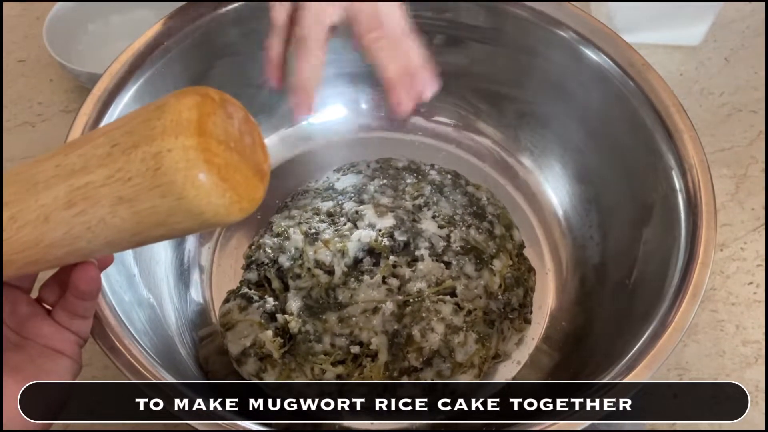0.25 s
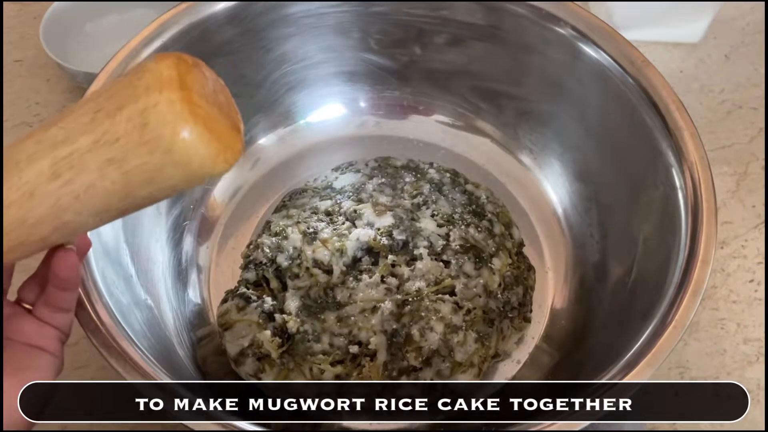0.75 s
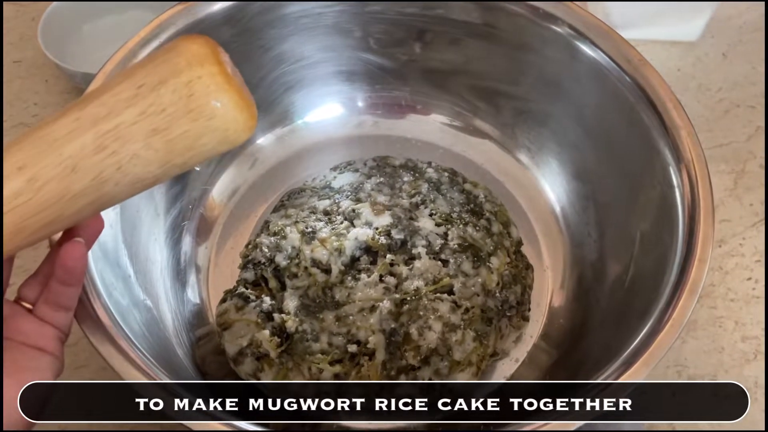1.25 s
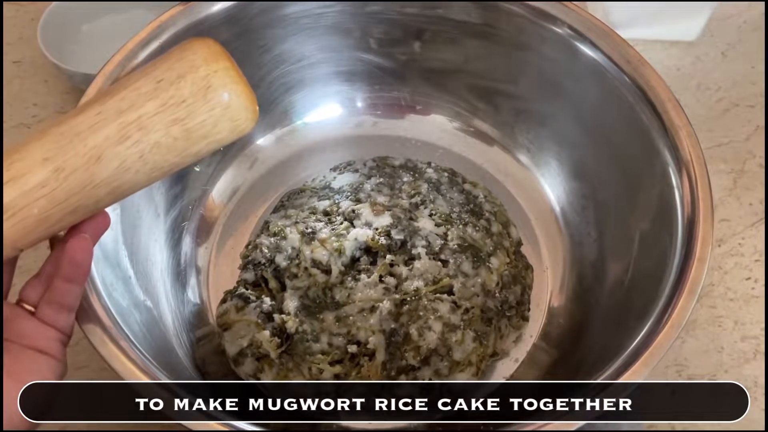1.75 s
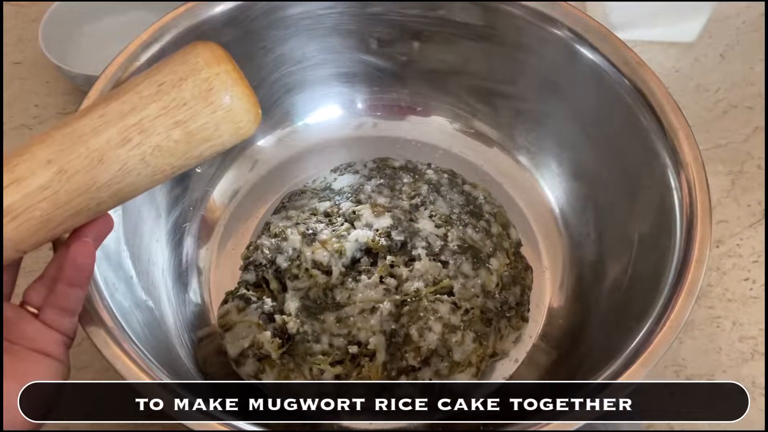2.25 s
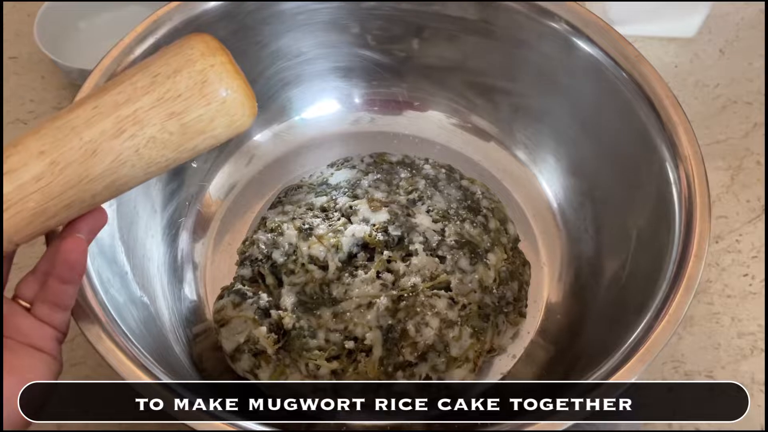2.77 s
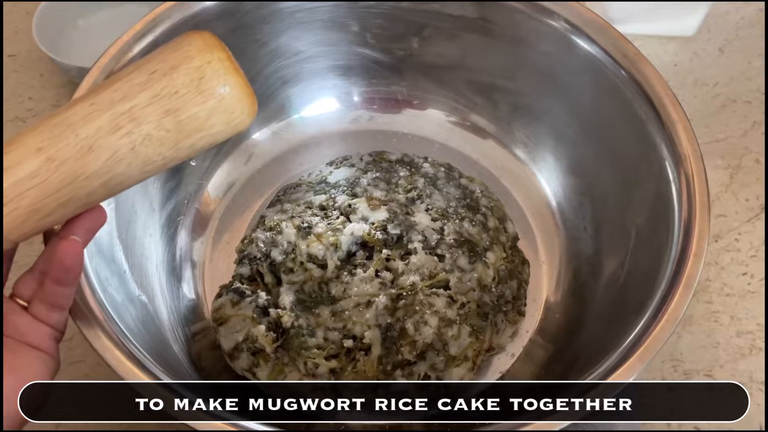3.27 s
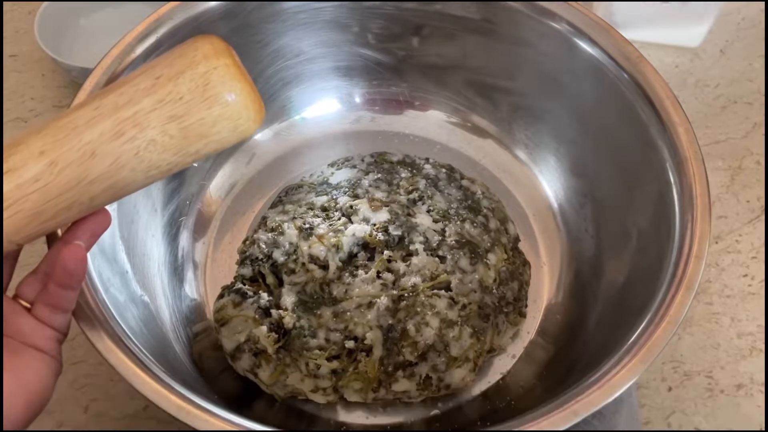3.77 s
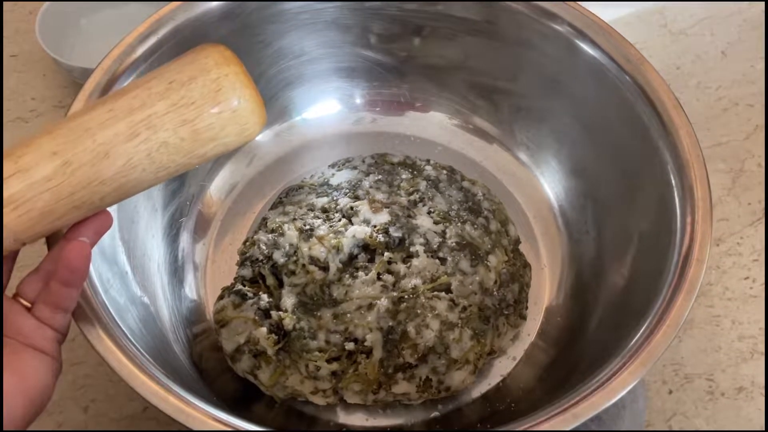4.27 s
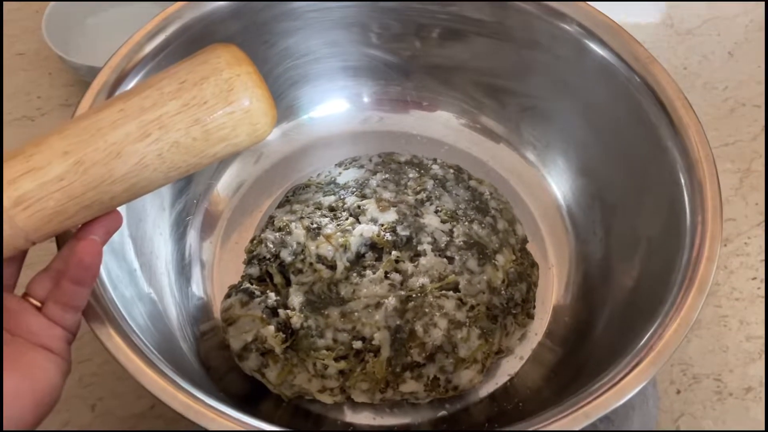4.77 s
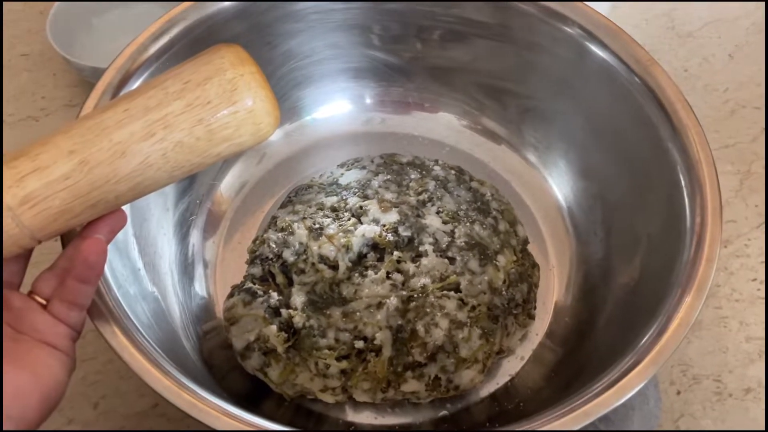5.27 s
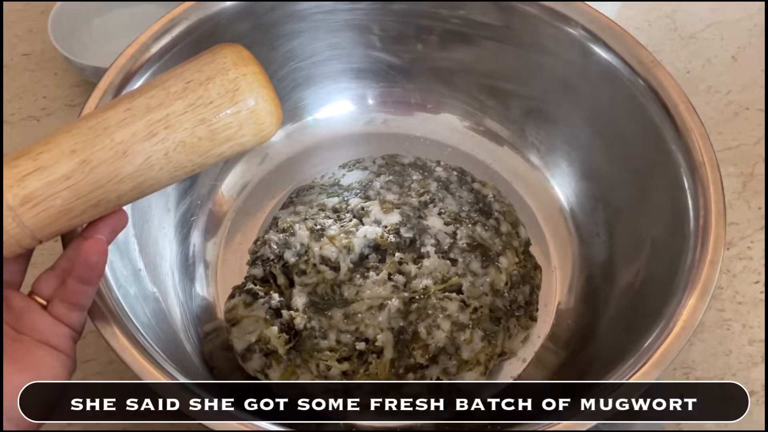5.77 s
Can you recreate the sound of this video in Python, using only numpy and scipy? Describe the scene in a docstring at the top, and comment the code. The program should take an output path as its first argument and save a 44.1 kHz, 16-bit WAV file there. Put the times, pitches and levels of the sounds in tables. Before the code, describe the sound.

Close up in a small, lightly echoing kitchen, a wooden pestle and dough-filled steel bowl are handled on a counter. Small clattering knocks come first, then a heavy double thud, a near-quiet pause with a faint squeak, a sharp metallic clank, and irregular clusters of dull thuds and short scrapes until the end. Low bumps and soft room hum lie beneath.

```python
"""Knocks: a wooden pestle and a steel bowl of sticky dough are knocked about on a kitchen counter.
Each knock adds a crack of smeared clicks, a damped thud, a counter boom and a little ring of the bowl.
Clinks of bare steel and a singing rim are fading tones. Drags, squeaks and ticks are shaped noise.
The kitchen echoes with fading noise, a wavering 50 Hz hum thumps and swells, and the room hums behind."""
import sys
import numpy as np
from scipy import signal
from scipy.fft import rfft, irfft, next_fast_len
from scipy.io import wavfile
from scipy.ndimage import uniform_filter1d

SR = 44100
rng = np.random.default_rng(int(sys.argv[2]) if len(sys.argv) > 2 else 0)


def to_wav(s):
    """Save 16-bit WAV."""
    ch = np.atleast_2d(s).T  # columns
    pcm = np.round(np.clip(ch, -1, 1) * 32767)  # PCM
    wavfile.write(sys.argv[1], SR, pcm.astype(np.int16))


N = 265482   # length of the scene in samples

# Knocks: start_s, crack_db, crack_tilt_db_per_octave, top_treble_db, crack_smear_s, thud_db, thud_hz,
#         thud_delay_s, thud_swell_s, counter_boom_db, ring_db (relative to the crack)
KNOCK_EVENTS = [(0.9, -31.5, -6, -70.5, .002, -63, 483, .001, 0.0043, -55, -25),
                (0.908, -17, -5.5, -42, 0.0013, -32.5, 555, 0.00287, 0.007, -58.5, -47),
                (0.917, -22, -4.5, -44, 0.00081, -16.5, 537, 0.00096, 0.002, -33.5, -5.5),
                (1.002, -24.5, -13.5, -52.5, .001, -23, 488, 0.00093, 0.0036, -32.5, 0.5),
                (1.014, -19, -10, -59, 0.00085, -24, 439, 0.0008, 0.0035, -31, -8),
                (1.02, -31, -4, -59, .0012, -25, 418, 0.0022, 0.0065, -44, -14),
                (1.147, -27, -8.5, -79, 0.0026, -27, 444, 0.0017, 0.0045, -44, -25),
                (1.158, -27, -9, -77, 0.0032, -28, 388, 0.002, 0.0032, -39.5, -28),
                (1.172, -29.5, -7.5, -75, 0.0013, -24.5, 417, 0.0013, 0.0042, -33.5, -16),
                (1.200, -26, -9, -73, 0.0015, -29, 430, 0.0023, 0.0072, -46, -13),
                (1.212, -31, -5, -68, 0.00073, -21.5, 267, 0.0011, 0.002, -27, -10),
                (1.353, -25.5, -12.5, -63, 0.00074, -23, 268, 0.002, 0.006, -26.5, -15.5),
                (1.603, -15.5, -6.5, -35, .0012, -5, 194.3, 0.0028, 0.0071, -36.5, -9.5),
                (1.637, -18, -10.5, -48, .001, -12, 381, 0.00094, 0.0019, -18.5, -33),
                (2.817, -38.5, -3.5, -73, 0.00074, -40, 310, 0.0041, 0.0033, -65, -7),
                (2.859, -34, 0, -66, 0.00092, -26.5, 221, .005, 0.006, -34.5, -11),
                (3.025, -9, -3.5, -21, 0.00071, -14.5, 236.5, 0.0041, 0.0067, -42.5, -9.5),
                (3.37, -19.5, -8, -59, 0.0013, -17, 220, .006, 0.0053, -54, -9.5),
                (3.4157, -23, -6.5, -42, 0.00097, -14.5, 207, .007, 0.0056, -35.5, -23),
                (3.433, -28, -4, -40, 0.0015, -18, 225, 0.0042, 0.005, -27.5, -6.5),
                (3.45, -26.5, -2.5, -20.5, 0.00022, -8.5, 204.6, 0.0055, 0.007, -13.5, -18),
                (3.484, -33, -9.5, -55, 0.001, -18.5, 198, 0.0017, 0.0039, -33.5, -6),
                (3.754, -49, -2, -59, 0.0012, -31.5, 258, 0.0012, 0.0032, -43, -20),
                (3.767, -43.5, -3, -53, .001, -25.5, 285, 0.00753, 0.0024, -28, -17),
                (3.976, -50, -1.5, -77, 0.00094, -25, 277, 0.0022, 0.007, -48, -5),
                (3.997, -51, -3, -55, .0012, -27, 270, 0.0022, 0.006, -42, -12),
                (4.045, -50, -9, -65, 0.0017, -28, 281, 0.0022, 0.0033, -37, -13),
                (4.179, -16.5, -10.5, -40, .0008, -11, 322, 0.0024, 0.0043, -27, -15.5),
                (4.190, -37, -3, -50, 0.00087, -17, 281, 0.0031, 0.0082, -35.5, -5),
                (4.233, -18.5, -6.5, -45, 0.00068, -13.5, 238, 0.0024, 0.0015, -37, -13.5),
                (4.243, -32.5, -17, -60, 0.0015, -17, 371, 0.0022, 0.0038, -45, -17.5),
                (4.351, -63, -12, -90, .002, -36, 165, 0.0022, 0.014, -47.5, -24),
                (4.406, -45, -8, -84, 0.0021, -39, 134, 0.0039, 0.013, -52, -22),
                (4.622, -38.5, -4.5, -49.5, 0.0018, -25.5, 292, 0.0074, 0.003, -34.5, -10),
                (4.697, -46.5, -3, -81, 0.00081, -32.5, 317, 0.00091, 0.004, -34, -11),
                (4.8161, -21.5, -5.5, -40.5, 0.0011, -20.5, 215, 0.0054, 0.0047, -58, -10),
                (4.832, -36, -3.5, -40.5, 0.0012, -17, 248, 0.0036, 0.0014, -50.5, -24),
                (4.846, -46, -8, -69, 0.00093, -28.5, 212, 0.0015, 0.011, -48, -17),
                (4.865, -33.5, -13, -66, 0.0014, -32, 308, 0.00074, 0.0022, -55, -20),
                (4.921, -19.5, -12.5, -45, 0.00084, -19, 264, 0.0023, 0.0054, -36.5, -23),
                (4.941, -38, -16, -60, 0.00081, -20.5, 260, 0.0037, 0.0018, -40, -23),
                (5.141, -28, -7, -50, .0012, -6, 250, 0.0025, 0.0022, -38, -22),
                (5.158, -44.5, -4, -70, 0.00078, -20, 367, 0.0055, 0.0023, -51, -19),
                (5.255, -32, -4.5, -61, 0.003, -38, 294, .001, .003, -54, -25),
                (5.261, -16.5, -7, -41.5, 0.0014, -7.5, 258, 0.0019, 0.004, -13.5, -27),
                (5.284, -51, -23, -75, 0.00088, -20, 266, 0.0035, 0.0025, -35, -15),
                (5.475, -45.5, -1, -57, 0.0016, -38.5, 347, 0.0039, 0.0062, -35, -13),
                (5.55, -33.5, -6.5, -57, 0.001, -27, 234, 0.0011, 0.003, -50, -27),
                (5.556, -37, -8.5, -63, .0012, -19, 402, 0.001, 0.0019, -43.5, -20),
                (5.572, -49.5, -8, -87, 0.0011, -27.5, 449.5, 0.00301, 0.015, -52.5, -23),
                (5.613, -25, -10, -62, 0.0014, -31, 398, 0.0012, 0.0045, -52.5, -27),
                (5.624, -28.5, -5.5, -58, 0.0011, -25, 333, 0.0031, 0.0035, -34.5, -24),
                (5.634, -45, 0, -68, 0.0018, -29.5, 222, 0.002, 0.004, -49, -23),
                (5.822, -41, -4, -75, 0.0013, -31.5, 146, .003, 0.0012, -55, -30),
                (5.834, -43, -6.5, -76, .0012, -40, 254, 0.0036, 0.0038, -33, -30)]
# Bands of the crack, low to high: low_hz, high_hz
CRACK_BANDS_HZ = [(350, 700), (700, 1500), (1500, 3000), (3000, 6000), (6000, 16000)]
# Colour shared by all cracks, one value for each of the four lower bands: level_db
CRACK_COLOUR = [-0.039, 0.99, 0.13, 0.2]
TILT_BEND = 1.12        # a soft contact loses its top octaves faster than its low ones
CRACK_CREST_DB = 21.5   # each band of a crack is set this far below its listed level
SCUFF_DB, SCUFF_T60_S = -19, 0.041   # grainy scuff after each crack; T60 = time to fall by 60 dB
COUNTER_BOOM_HZ, COUNTER_BOOM_T60_S = 123, 0.062
# Ringing notes of the bowl wall, stifled by the dough: pitch_hz, level_db, t60_s
BOWL_MODES = [(364, 2, 0.031), (544, 6.5, 0.034), (655.5, 5, 0.039), (729, 2, 0.073), (883, 5.5, 0.053),
              (821, -0.5, 0.043), (1173, 2, 0.034), (1500, -10, 0.035)]

# Short clinks of the bare wall, most of them with a knock: start_s, level_db, favoured_pitch_hz
CLINK_EVENTS = [(.909, -31, 1500), (.918, -34, 900), (1.001, -38, 2300), (1.013, -46.5, 2300),
                (1.028, -48, 1900), (1.146, -44, 1800), (1.203, -49, 1800), (1.604, -31, 900),
                (1.638, -33.5, 1700), (2.86, -47, 3500), (3.0255, -9, 1500), (3.027, -21, 4500),
                (3.417, -33.5, 1100), (3.768, -43, 1150), (3.94, -44, 1150), (4.18, -37.5, 1500),
                (4.235, -38, 2200), (4.817, -36.5, 2300), (4.833, -43, 4500), (5.262, -37.5, 1500),
                (5.623, -53, 1700)]
# Ringing notes of the bare upper wall of the bowl: pitch_hz, level_db
BARE_STEEL_MODES = [(735, 4), (893, 6), (1150, -5.5), (1700, -2), (1900, -6), (2190, -6), (2270, -0.5),
                    (2485, -1.5), (2870, -3.5), (3470, -11.5), (3900, -10.5), (4480, -4.5), (4940, -4),
                    (5700, -4.5)]
CLINK_FALL_DB_PER_OCTAVE = 7.5   # notes far from the favoured pitch are weaker
BARE_T60_S = .028                # the hand on the bowl stops it quickly

# Times at which the rim's note sets in: start_s, level_db
RIM_EVENTS = [(0.941, -43.5), (1.03, -33), (1.09, -39.5), (1.165, -40), (1.215, -43.5), (1.359, -44.5),
              (1.645, -43.5), (3.032, -28), (4.245, -36), (4.3, -50.5), (4.924, -37), (5.15, -29.5),
              (5.27, -36), (5.56, -32), (5.626, -35)]
RIM_HZ, RIM_T60_S = 445.3, 0.42   # the one free note of the rim

# Strokes of dragging on the counter: full_strength_start_s, hold_s, level_db
DRAG_STROKES = [(.91, 0.0092, -43), (1.155, 0.0077, -40), (1.21, 0.0037, -39), (2.83, 0.06, -50.5),
                (3.63, 0.011, -48), (3.765, 0.03, -44), (3.91, 0.099, -38.5), (4.27, 0.14, -51.5),
                (5.33, 0.021, -50.5), (5.5, 0.0036, -40), (5.595, 0.022, -39)]
# Resonances of the counter under the drag: pitch_hz, width_hz, level_db
COUNTER_RESONANCES = [(242, 140, 43), (400, 74, -14.5), (1150, 400, -41.5), (2000, 900, -13.5),
                      (3500, 2500, -57.5)]
DRAG_RISE_DB_PER_S, DRAG_FALL_DB_PER_S = 448, 244.5

# Faint squeaks: start_s, end_s, pitch_hz, width_hz, level_db, rise_s, level_change_db
SQUEAK_EVENTS = [(2.505, 2.6, 2110, 90, -53, .008, -9), (2.59, 2.74, 2090, 100, -65, .02, -1),
                 (2.795, 2.835, 1540, 120, -56, .02, 0), (2.84, 2.885, 1540, 100, -51, .012, -3),
                 (2.79, 2.88, 4020, 170, -65, .03, 2), (4.345, 4.435, 4150, 120, -66, .015, -3),
                 (5.6, 5.71, 1930, 260, -60, .04, 6), (5.7, 5.79, 1990, 220, -53, .012, -10)]
# Tiny sticky ticks: start_s, level_db (before the noise and the treble filter)
TICK_EVENTS = [(0.104, -55), (.16, -71), (.2, -59), (.235, -64), (3.772, -61), (4.527, -51), (5.463, -46),
               (5.49, -68)]

# Low thumps and swells of a wavering 50 Hz hum: full_strength_start_s, hold_s, level_db
LOW_SWELLS = [(0.0, 0.02, -49), (.99, 0.025, -45.5), (1.61, 0.042, -41), (2.25, 0.04, -44),
              (2.45, 0.11, -47.5), (2.7, 0.079, -48), (3.39, 0.018, -40.5), (3.57, 0.023, -48.5),
              (4.07, 0.017, -31), (4.25, 0.12, -45.5), (5.28, .02, -53), (5.45, .02, -64),
              (5.87, 0.0057, -29), (5.99, 0.035, -34.5)]
LOW_RISE_DB_PER_S, LOW_FALL_DB_PER_S = 299, 199
LOW_HZ, LOW_WIDTH_HZ = 49.94, 7
LOW_MURMUR_DB = -53.5   # the low hum never quite rests

# How the kitchen's echo dies away at each pitch: pitch_hz, t60_s, level_db
KITCHEN_DECAY = [(100, 0.82, 0.5), (192, 0.56, -5.5), (297, 0.27, -5.5), (463, 0.52, 2), (710, 0.42, -2),
                 (1840, 0.62, -3), (2420, 0.47, 1.5), (3200, 0.58, 5), (4160, .46, 4), (5600, 0.43, 4.5),
                 (8750, 0.58, -6), (14000, .25, -0.5)]
ECHO_DB = -36.5
# Low standing waves of the kitchen: pitch_hz, width_hz, level_db
ROOM_RESONANCES = [(115, 7, -15.5), (187, 15, -12.5)]

# Colour of the hum common to both channels: pitch_hz, relative_level_db
HUM_MID_COLOUR = [(60, -30.5), (75, -1.5), (113, -0.5), (170, -5.5), (204, -6.5), (394, -18), (441, -13),
                  (606, -22), (834, -23), (2170, -28), (3820, -29.5), (8700, -45), (9500, -66),
                  (14000, -101), (14600, -62.5), (15800, -51.5)]
# Colour of the hum opposed in the two channels: pitch_hz, relative_level_db
HUM_SIDE_COLOUR = [(41, -33), (70, -28.5), (190, -3.5), (344, -1), (422, 2.5), (727, 2.5), (1070, 0),
                   (2120, -7.5), (2720, -3), (3040, -6.5), (10400, -17.5), (16000, -30)]
HUM_MID_DB, HUM_SIDE_DB = -48.5, -59.5   # average (RMS) levels

# The sound common to both channels is dull at the top; the brightest treble is mostly opposed.
# Colour of the common part of near sound: pitch_hz, level_db
COMMON_NEAR_COLOUR = [(8500, 1.5), (11500, -22.5), (13200, -20), (14200, -10)]
# Colour of the common part of the echo: pitch_hz, level_db
COMMON_ECHO_COLOUR = [(8500, 2), (9800, -24.5), (13500, -42), (14500, -24)]
# The channels differ more in the treble than in the bass: pitch_hz, side_level_db
SIDE_COLOUR = [(60, -26.5), (120, -33.5), (240, -19.5), (480, 0), (950, 0), (1890, -2), (3770, -1.5),
               (7520, 5.5), (15000, -2.5)]
# How far the side lags behind the mid: pitch_hz, lag_radians
SIDE_LAG = [(200, .3), (400, 0.77), (700, 2.15), (1400, 2.1), (2800, 1.73), (5600, 1.6)]
CUTOFF_HZ = 16600


def knocks():
    """Every knock adds a bowl ring, a crack, a thud and a counter boom."""
    size = SR // 2
    sound, t = np.zeros(N + SR), np.arange(size) / SR
    filters = [signal.butter(2, edges, "band", fs=SR, output="sos") for edges in CRACK_BANDS_HZ]
    for row in KNOCK_EVENTS:
        (start, crack_db, tilt_db, treble_db, smear, thud_db, thud_hz,
         delay, swell, boom_db, ring_db) = row
        band_levels_db = [crack_db + base_db + tilt_db * octave ** TILT_BEND
                          for octave, base_db in enumerate(CRACK_COLOUR)]
        band_levels_db.append(treble_db)
        late = np.maximum(t - delay, 0)   # the edge touches first, the weight lands after
        knock = bowl_ring(t, band_levels_db, ring_db, smear)
        short_crack = crack(smear, band_levels_db, filters)
        knock[:len(short_crack)] += short_crack
        knock += thud(late, thud_db, thud_hz, swell)
        knock += counter_boom(late, boom_db)
        i = round(start * SR)
        sound[i:i + size] += knock
    return sound[:N]


def crack(smear, band_levels_db, filters):
    """A rough smeared click and a noisy scuff, with each pitch band set to its own level."""
    grit = chatter(smear, rng.random(5))
    t = np.arange(len(grit)) / SR
    grit = grit * (1 - np.exp(-t / (0.87 * smear)))   # the first contact is light
    scuff = amp(SCUFF_DB - 60 * t / SCUFF_T60_S) * rng.standard_normal(len(grit))
    grit += scuff * (1 - np.exp(-t / 0.00087))
    out = np.zeros(len(grit))
    # alternate signs leave no dip between bands
    for sos, band_db, sign in zip(filters, band_levels_db, [1, -1, 1, -1, 1]):
        out += sign * amp(band_db - CRACK_CREST_DB) * rms_one(signal.sosfilt(sos, grit))
    return out


def chatter(spread, shares):
    """Short allpass delays in a chain smear a click: rough in time, even in colour; 2048 samples."""
    x = np.eye(1, 2048)[0]
    for share in shares:
        delay = max(round(spread * (0.22 + share) * SR), 1)
        taps = np.zeros(delay + 1)
        taps[[0, -1]] = -.62, 1
        x = signal.lfilter(taps, taps[::-1], x)
    return x


def thud(late, level_db, hz, swell):
    """A damped low note sags in pitch as the dough yields, then is stifled."""
    press = late / max(swell, .002)
    sag = 1 + 0.058 * np.exp(-press)   # starts 5.8 % high and settles on hz
    turns = hz * np.cumsum(sag * (late > 0)) / SR
    return amp(level_db) * (press * np.exp(1 - press)) ** 2 * np.sin(2 * np.pi * turns)


def counter_boom(late, level_db):
    """The counter answers the landing weight with one low note that swells and dies."""
    shape = (1 - np.exp(-late / 0.0036)) * amp(-60 * late / COUNTER_BOOM_T60_S)
    return amp(level_db) * shape * np.sin(2 * np.pi * COUNTER_BOOM_HZ * late)


def bowl_ring(t, band_levels_db, ring_db, smear):
    """The bowl wall rings on several notes; a brighter crack wakes the higher ones."""
    ring, centres = np.zeros(len(t)), np.log(CRACK_BANDS_HZ).mean(axis=1)
    for (hz, mode_db, t60), luck in zip(BOWL_MODES, rng.standard_normal(len(BOWL_MODES))):
        crack_here_db = np.interp(np.log(hz), centres, band_levels_db)
        drive_db = crack_here_db + ring_db + mode_db + 1.5 * luck
        ring += amp(drive_db - 60 * t / t60) * np.sin(2 * np.pi * hz * t)
    return ring * (1 - np.exp(-(t / (2 * smear)) ** 2))


def clinks():
    """Each clink rings the bare wall, most of all on notes near its favoured pitch."""
    out, t = np.zeros(N + SR), np.arange(SR // 4) / SR
    onset = 1 - np.exp(-t / 0.001)
    for start, level_db, best_hz in CLINK_EVENTS:
        i = round(start * SR)
        for hz, mode_db in BARE_STEEL_MODES:
            loss_db = CLINK_FALL_DB_PER_OCTAVE * abs(np.log2(hz / best_hz))
            drive_db = level_db + mode_db + 1.5 * rng.standard_normal() - loss_db
            fade = amp(drive_db - 60 * t / BARE_T60_S)
            out[i:i + len(t)] += fade * onset * np.sin(2 * np.pi * hz * t)
    return out[:N]


def rim():
    """The rim sings one slowly fading note that sets in again and again."""
    out, t = np.zeros(N), np.arange(N) / SR
    for start, level_db in RIM_EVENTS:
        since = np.maximum(t - start, 0)
        shape = amp(level_db - 60 * since / RIM_T60_S) * (1 - np.exp(-since / 0.0007))
        out += shape * np.sin(2 * np.pi * RIM_HZ * since)
    return out


def drag():
    """Dense uneven slips of wood and steel shake the counter's resonances."""
    happens = rng.random(N) < 1500 / SR   # about 1500 slips per second
    strength = amp(3 * np.minimum(rng.exponential(1, N), 4))
    slips = happens * strength * rng.choice([-1, 1], N)
    shake = np.zeros(N)
    for hz, width_hz, level_db in COUNTER_RESONANCES:
        answer = resonate(resonate(slips, hz, width_hz), hz, 2 * width_hz)
        shake += amp(level_db) * rms_one(answer)
    return rms_one(shake) * swells(DRAG_STROKES, DRAG_RISE_DB_PER_S, DRAG_FALL_DB_PER_S)


def squeaks():
    """Noise goes twice through a narrow resonance, swells in and changes level until it stops."""
    out, t = np.zeros(N), np.arange(N) / SR
    for start, end, hz, width_hz, level_db, rise, change_db in SQUEAK_EVENTS:
        edges = np.clip(np.minimum((t - start) / rise, (end - t) / 0.01), 0, 1)
        progress = np.clip((t - start) / (end - start), 0, 1)
        tone = resonate(resonate(rng.standard_normal(N), hz, width_hz), hz, width_hz)
        out += edges * amp(level_db + change_db * progress) * rms_one(tone)
    return out


def ticks():
    """Short bright puffs of noise as dough lets go of skin or wood."""
    clicks, t = np.zeros(N), np.arange(600) / SR
    for start, level_db in TICK_EVENTS:
        clicks[round(start * SR)] = amp(level_db)
    puffs = signal.fftconvolve(clicks, np.exp(-t / 0.0031))[:N] * rng.standard_normal(N)
    return signal.sosfilt(signal.butter(4, 7000, "high", fs=SR, output="sos"), puffs)


def low_hum():
    """Noise in a narrow resonance makes a wavering 50 Hz hum that thumps and swells."""
    noise = rng.standard_normal(N + SR)
    hum = resonate(resonate(noise, LOW_HZ, LOW_WIDTH_HZ), LOW_HZ, 3 * LOW_WIDTH_HZ)
    hum = hum[SR:]   # drop the first second, while the resonance builds up
    power = uniform_filter1d(hum ** 2, SR // 24)
    steady = hum / np.sqrt(power + 0.073 * np.mean(hum ** 2))   # its level is evened out
    gain = swells(LOW_SWELLS, LOW_RISE_DB_PER_S, LOW_FALL_DB_PER_S) + amp(LOW_MURMUR_DB)
    return gain * rms_one(steady)


def kitchen(x):
    """Echo made of noise that builds for a few ms and dies at its own rate in each half octave."""
    t, echo = np.arange(SR) / SR, np.zeros(SR)
    edges = 60 * 2.0 ** np.arange(0, 8.6, .5)
    for low, high in zip(edges, edges[1:]):
        sos = signal.butter(2, [low, high], "band", fs=SR, output="sos")
        band = signal.sosfilt(sos, rng.standard_normal(SR))
        hz = np.sqrt(low * high)
        t60 = max(at_hz(KITCHEN_DECAY, hz), .03)
        echo += band * amp(at_hz(KITCHEN_DECAY, hz, column=2) - 60 * t / t60)
    echo *= np.clip((t - .004) / 0.0021, 0, 1)   # silent for the first 4 ms
    return amp(ECHO_DB) * signal.fftconvolve(x, echo)[:N]


def room_notes(x):
    """The kitchen's low standing waves ring along with the near sound."""
    return sum(amp(db) * resonate(x, hz, width_hz) for hz, width_hz, db in ROOM_RESONANCES)


def room_hum(level_db, points):
    """Steady noise, coloured to make the hum of the room."""
    return amp(level_db) * rms_one(colour(rng.standard_normal(N), points))


def swells(rows, rise_db_per_s, fall_db_per_s):
    """Loudness curve of events that rise, hold and fall at steady rates in dB."""
    t, gain = np.arange(N) / SR, np.zeros(N)
    for start, hold, level_db in rows:
        rise_db = rise_db_per_s * np.maximum(start - t, 0)
        fall_db = fall_db_per_s * np.maximum(t - start - hold, 0)
        gain += amp(level_db - rise_db - fall_db)
    return gain


def resonate(x, hz, width_hz):
    """Let a signal ring at one pitch, with a gain of about 1 at the top of the resonance."""
    r = np.exp(-np.pi * width_hz / SR)
    feedback = [1, -2 * r * np.cos(2 * np.pi * hz / SR), r * r]
    return signal.lfilter([(1 - r * r) / 2, 0, (r * r - 1) / 2], feedback, x)


def colour(x, points, phase=((1, 0), (2, 0))):
    """Shape a signal by a (pitch_hz, level_db) curve and a (pitch_hz, lag_radians) curve."""
    size = next_fast_len(len(x) + 4096)
    hz = np.fft.rfftfreq(size, 1 / SR)
    change = amp(at_hz(points, hz)) * np.exp(-1j * at_hz(phase, hz))
    return irfft(rfft(x, size) * change, size)[:len(x)]


def at_hz(points, hz, column=1):
    """Read a table column at any pitch, in straight lines over log pitch."""
    p = np.array(points)
    return np.interp(np.log(hz + 1), np.log(p[:, 0]), p[:, column])


def amp(db):
    """Turn decibels into a plain gain."""
    return 10 ** (np.asarray(db) / 20)


def rms_one(x):
    """Scale a signal to an average (RMS) level of 1."""
    return x / np.sqrt(np.mean(x ** 2) + 1e-20)


def scene():
    """Build the common part (mid) and the opposed part (side), then the two channels."""
    near = knocks() + clinks() + drag() + squeaks() + ticks()
    rim_note, low = rim(), low_hum()
    mid = colour(near + rim_note, COMMON_NEAR_COLOUR)
    mid += colour(kitchen(near), COMMON_ECHO_COLOUR)
    mid += low + room_notes(near)
    mid += room_hum(HUM_MID_DB, HUM_MID_COLOUR)
    # the side has its own echo noise
    side = colour(near + rim_note + kitchen(near), SIDE_COLOUR, SIDE_LAG)
    side += amp(-37.5) * np.roll(low, 300)   # a faint copy of the low hum, 300 samples late
    side += room_hum(HUM_SIDE_DB, HUM_SIDE_COLOUR)
    return np.array([mid + side, mid - side])


def record(dry):
    """The loudest peaks are rounded, then the top treble is cut steeply."""
    rounded = dry / (1 + (dry / .95) ** 4) ** .25
    # 80 dB down from the cutoff upwards
    return signal.sosfilt(signal.cheby2(20, 80, CUTOFF_HZ, fs=SR, output="sos"), rounded)


dry = scene()
out = record(dry)
to_wav(out)
```